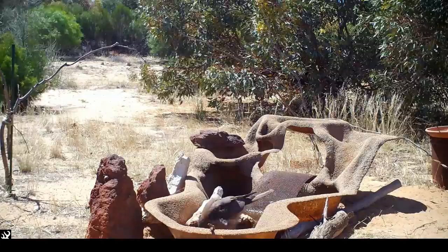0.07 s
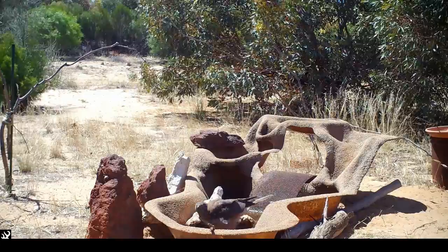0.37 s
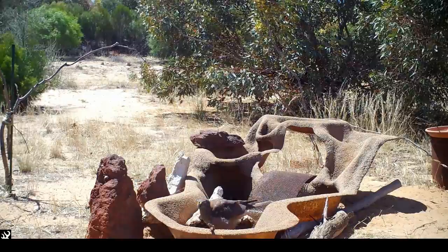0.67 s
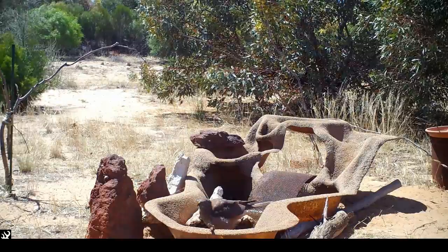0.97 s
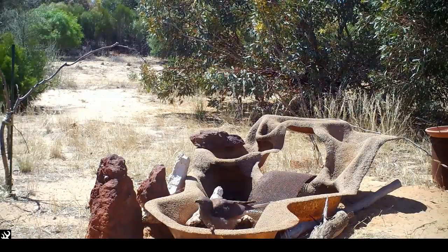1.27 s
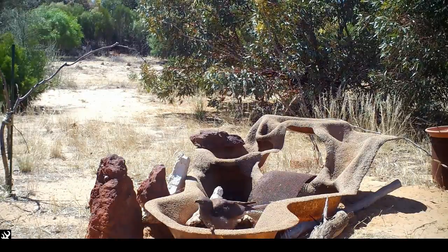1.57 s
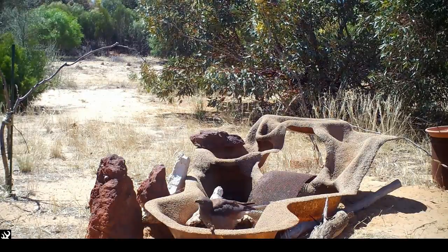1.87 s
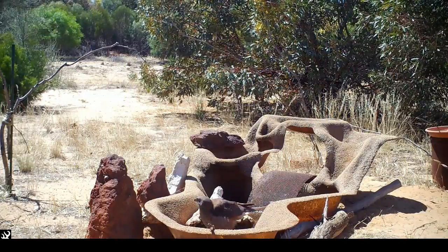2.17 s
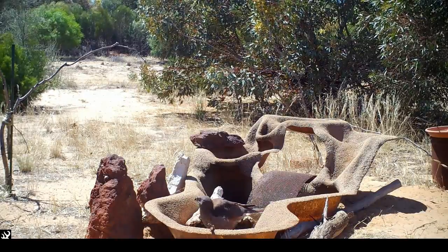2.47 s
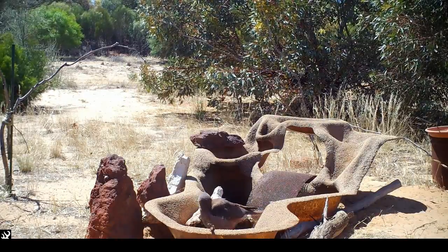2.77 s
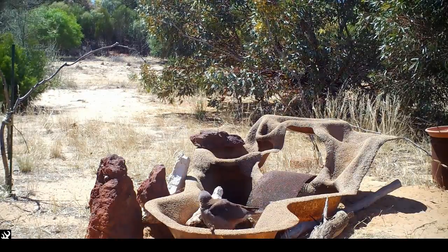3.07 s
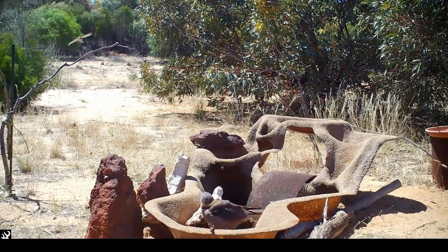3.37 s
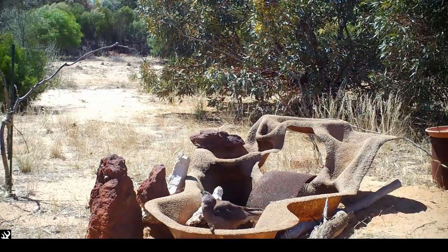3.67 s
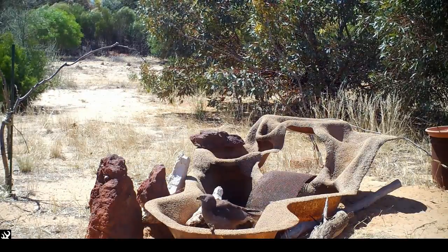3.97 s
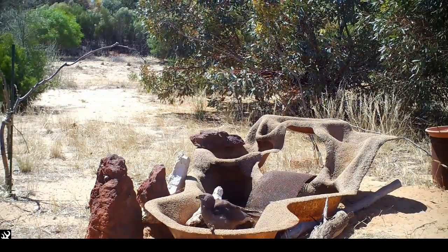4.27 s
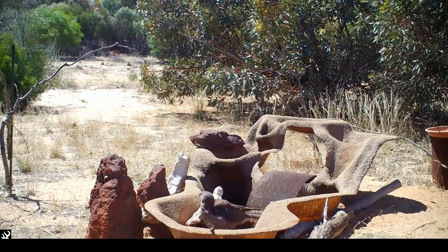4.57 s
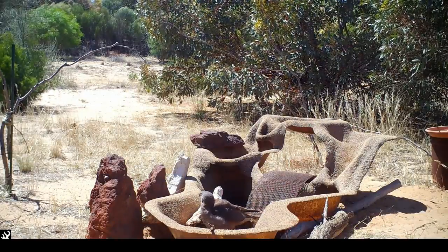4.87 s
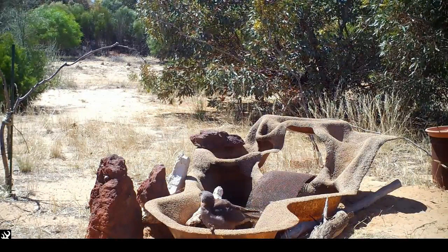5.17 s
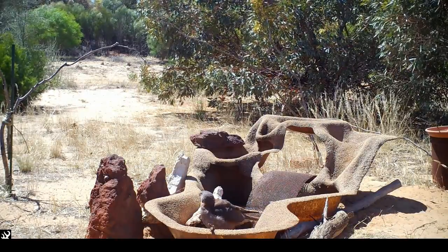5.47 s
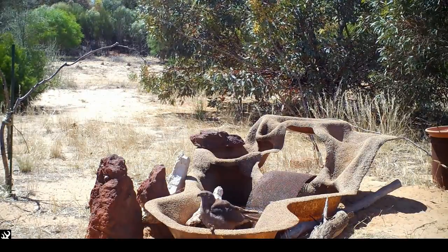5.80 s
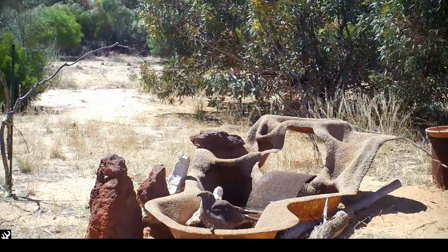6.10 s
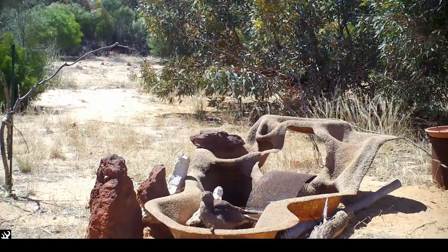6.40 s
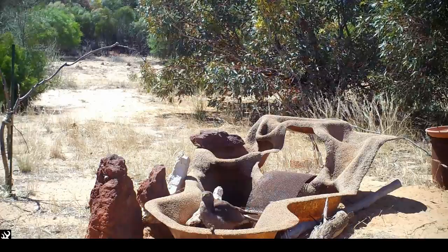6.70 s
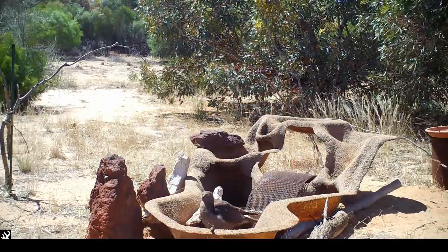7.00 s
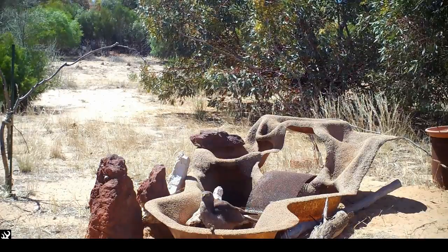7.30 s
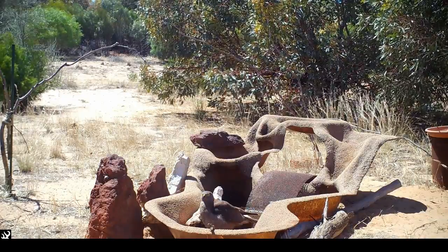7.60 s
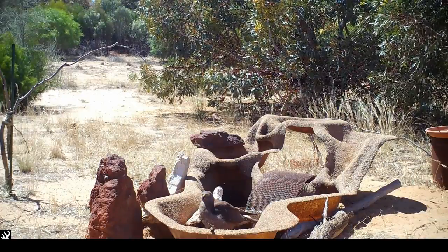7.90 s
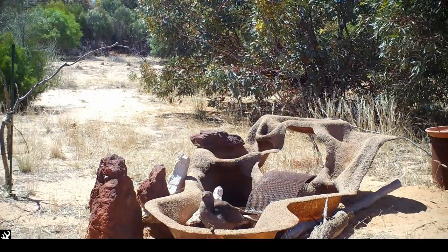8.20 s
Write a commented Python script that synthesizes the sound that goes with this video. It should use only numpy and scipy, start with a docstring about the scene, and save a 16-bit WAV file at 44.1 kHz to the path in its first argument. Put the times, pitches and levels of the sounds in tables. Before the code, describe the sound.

Light wind hisses steadily through dry scrub and softly brushes the microphone. A bee hums faintly past. Around the middle, a nearby bird snaps its bill once, then sings a quick two-second phrase of buzzy rising slurs, stepped whistles and dipping chirps. The song scatters lightly off rocks and trees and fades a little toward its end, leaving only the soft wind in the garden.

```python
"""Light wind hisses in dry scrub and brushes the microphone, over a faint camera whine; a bee hums past.
A bird snaps its bill once, then sings fourteen quick notes: buzzy rising slurs, stepped whistles and
dipping chirps; the last slur leaves a faint distant echo. The syrinx makes gliding harmonics and its
fluttering membranes add the buzz. The song bounces off hard ground; rocks, shrubs and trees scatter
both song and snap. A tiny peep sounds near the start and another near the end."""
import sys
import numpy as np
from scipy import signal
from scipy.fft import rfft, irfft
from scipy.io import wavfile
from scipy.ndimage import uniform_filter1d

SR = 44100
rng = np.random.default_rng(int(sys.argv[2]) if len(sys.argv) > 2 else 0)


def log_audio(samples):
    """Write samples as a 16-bit WAV file to the path given in sys.argv[1]."""
    # one column per channel
    frames = np.atleast_2d(samples).T
    # limit to full scale, then quantise
    limited = np.clip(frames, -1, 1)
    pcm = np.round(limited * 32767).astype(np.int16)
    wavfile.write(sys.argv[1], SR, pcm)


N = 363825
T = np.arange(N) / SR

# Table levels are relative, within each layer.
# hiss of air in the scrub: f/Hz, level/dB
LEAF_HISS = [(25, -22.5), (54, -16), (130, -10.5), (230, -6.5), (420, -4), (900, -2), (1330, -4),
             (2240, -8), (3090, -13), (4000, -20), (5000, -29), (6300, -39.5), (8000, -45.5)]
# puffs of air on the microphone: t/s, half length/s, rumble gain/dB
MIC_PUFFS = [(.65, .4, 9), (2.733, 0.03, 20), (3.297, 0.29, 4), (4.935, .022, 17.5), (5.352, 0.32, -0.5)]
# the bee's fly-by: t/s, wingbeat f/Hz, level/dB
BEE_PASS = [(1.7, 237.4, -88), (1.88, 240.8, -68), (2.0, 232.5, -72), (2.1, 232.3, -63.5), (2.2, 223, -72),
            (2.399, 240, -88)]
# wingbeat harmonics, from the first up: level/dB
WING_HARMONICS = [-3, -12, -4, 1.5, -1]
# the bill's snap and its instant reflection: t/s, level/dB
SNAP_CLICKS = [(3.7799, 12), (3.7829, 6.5)]
# tone colour of the click, with a peak near 2 kHz and a dip near 3.9 kHz: f/Hz, level/dB
CLICK_COLOUR = [(300, -37), (700, -23.5), (1100, -10), (1500, -6.5), (1900, 4), (2400, -4.5), (3100, -7.5),
                (3900, -27.5), (5000, -11.5), (5700, -15.5), (6600, -39), (9400, -30), (11500, -49.5),
                (13500, -46.5), (16000, -57)]
# the bill opens as the phrase builds and closes as it fades: t/s, treble tilt/(dB per octave)
BILL_OPENING = [(4.06, -22), (4.13, -27), (4.19, 4), (4.29, -3.5), (4.37, 2.5), (4.73, 3), (5.36, 3),
                (5.6, 2), (5.94, -3.5)]
# harmonics of the syrinx, from the first up: level/dB
SYRINX_HARMONICS = [3, -0.5, -21.5, -25.5, -23, -28.5, -41]
# tone colour of the song, with the same peak and dip as the click: f/Hz, level/dB
SONG_COLOUR = [(750, -36), (1050, -23), (1300, -9), (1550, -1), (2000, 2.5), (2400, -8.5), (2750, -7.5),
               (3900, -38.5), (4900, -36), (6100, -14), (7000, -30.5), (8200, -46.5), (11000, -60.5)]
# air rushing through the throat on buzzy notes: f/Hz, level/dB
BREATH_SPECTRUM = [(500, -62.5), (1300, -22.5), (1750, -2), (2250, -11.5), (2900, -17), (4200, -32.5),
                   (6000, -33.5), (7000, -45), (9000, -66.5)]
# faint rising glides; the outer two are peeps, the middle two a distant echo of the last slur:
# t/s, length/s, start f/Hz, end f/Hz, level/dB
FAINT_GLIDES = [ (.747, 0.0068, 1590, 2200, -52), (6.020, 0.017, 1880, 2160, -53.5),
                (6.050, 0.013, 2100, 2170, -55), (8.083, 0.0084, 1600, 1980, -54)]
# dipping chirps: leap t/s, leap to dip/s, dip f/Hz, leap level/dB, dip level/dB, crest level/dB
CHIRP_NOTES = [ (4.562, 0.034, 2260, -28, -28, -30), (4.946, 0.03, 2165, -30, -26.5, -35),
               (5.335, .027, 2093, -30, -24, -36), (5.74, 0.032, 2090, -32.5, -28.5, -35.5)]
# stepped whistles: step t/s, hold before it/s, f/Hz, level/dB, mid-hold gain/dB, buzz/0-1,
# level after the step/dB
WHISTLE_NOTES = [ (4.478, 0.032, 1992, -21.5, -16.5, 0.4, -29), (4.853, 0.041, 1975, -24, -3, .05, -29.5),
                 (5.241, 0.046, 1939, -25.5, 4, .02, -28.5), (5.638, 0.044, 1924, -29, 0.5, .02, -33.5)]
# buzzy slurs: flick t/s, climb before it/s, attack/s, start f/Hz, knee f/Hz, top f/Hz,
# climb level/dB, flick level/dB
SLUR_NOTES = [ (4.191, 0.12, 0.019, 735, 1024, 2210, -27, -19.5),
              (4.365, 0.11, 0.0035, 839, 1076, 2275, -28.5, -21),
              (4.727, 0.071, 0.014, 985, 1156, 2375, -35, -22),
              (5.114, 0.074, 0.016, 1038, 1100, 2360, -34, -24),
              (5.509, .073, 0.0083, 983, 1074, 2360, -35, -26.5),
              (5.931, 0.091, 0.03, 955, 1057, 2310, -37, -30)]
# moments when a slur's buzz locks into a loud clear tone: t/s, half length/s, gain/dB
CLEAR_MOMENTS = [(4.084, 0.0058, 3), (4.141, 0.0072, 10), (4.163, 0.003, 5), (4.304, 0.014, 10)]


def undb(db):
    """Decibels to gain."""
    return 10 ** (np.asarray(db) / 20)


def unit(x):
    """Scale to rms 1."""
    return x / np.sqrt(np.mean(x ** 2))


def bump(t, at, width):
    """A smooth swell from 0 to 1 and back."""
    return np.exp(-((t - at) / width) ** 2)


def gain_at(hz, spectrum):
    """Gain of an (f/Hz, level/dB) curve, joined on a log-frequency axis."""
    at, db = np.transpose(spectrum)
    return undb(np.interp(np.log(np.maximum(hz, 1)), np.log(at), db))


def noise(spectrum):
    """Noise of rms 1, coloured by an (f/Hz, level/dB) curve."""
    hz = np.arange(N // 2 + 1) * SR / N
    return unit(irfft(rfft(rng.standard_normal(N)) * gain_at(hz, spectrum), N))


def drift(rate):
    """Smooth random movement of rms 1 that turns about rate times a second."""
    hold = max(int(SR / rate), 1)
    steps = np.repeat(rng.standard_normal(N // hold + 1), hold)
    return unit(uniform_filter1d(steps, hold)[:N])


def impulse_response(spectrum, size=1024):
    """Minimum-phase impulse response of an (f/Hz, level/dB) curve."""
    hz = np.arange(size // 2 + 1) * SR / size
    cepstrum = irfft(np.log(gain_at(hz, spectrum)))
    cepstrum[1:size // 2] *= 2
    cepstrum[size // 2 + 1:] = 0
    return irfft(np.exp(rfft(cepstrum)))


def camera(whine_hz=7796.3, flips_per_s=59.5, whine_db=-81.5, hiss_db=-89):
    """A thin whine that keeps flipping polarity, over faint electronic hiss."""
    polarity = uniform_filter1d(np.sign(np.sin(np.pi * flips_per_s * T)), size=40)
    whine = np.sqrt(2) * polarity * np.sin(2 * np.pi * whine_hz * T)
    hiss = noise([(3000, 11.5), (7500, 9.5), (10000, 1.5), (15000, -3.5)])
    return undb(whine_db) * whine + undb(hiss_db) * hiss


def wind(hiss_db=-57, rumble_db=-85, gust_hiss_db=1.5, gust_rumble_db=18):
    """A bed of leaf hiss and low buffets on the microphone; both swell with one soft gust."""
    gust = bump(T, at=4.26, width=0.75)
    hiss = noise(LEAF_HISS) * undb(hiss_db + gust_hiss_db * gust + 0.5 * drift(13))
    puffs_db = sum(db * bump(T, at, width) for at, width, db in MIC_PUFFS)
    rumble = noise([(12, -16), (35, -4.5), (90, -5.5), (200, -12.5), (800, -70), (3000, -100)])
    return hiss + rumble * undb(rumble_db + gust_rumble_db * gust + puffs_db + 3 * drift(12))


def bee(wobble=0.0065):
    """Beating wings make a wavering hum that swells and fades as the bee drifts by."""
    times, hz, db = np.transpose(BEE_PASS)
    wingbeat_hz = np.interp(T, times, hz) * (1 + wobble * drift(38))
    phase = 2 * np.pi * np.cumsum(wingbeat_hz) / SR
    hum = sum(undb(level) * np.sin(k * phase) for k, level in enumerate(WING_HARMONICS, 1))
    return hum * np.interp(T, times, undb(db), left=0, right=0)


def garden_echoes(x, near_t60=0.047, scrub_t60=1.0, trees_s=0.2):
    """Adds the garden's scatter to a sound; leaves soak up more treble on the longer paths."""
    t = T[:SR // 2]
    build_up = np.clip((t - .004) / 0.054, 0, 1)
    # level/dB, envelope, low-pass f/Hz
    paths = [(-14, build_up * undb(-60 * t / near_t60), 11000),  # near rocks and shrubs
             (-26, build_up * undb(-60 * t / scrub_t60), 4500),  # thin tail from the scrub
             (-31, bump(t, trees_s, width=0.033), 3000)]  # soft echo off the tree line
    scatter = 0
    for db, envelope, cutoff_hz in paths:
        echoes = undb(db) * envelope / np.linalg.norm(envelope) * rng.standard_normal(len(t))
        scatter = scatter + signal.sosfilt(signal.butter(2, cutoff_hz, fs=SR, output="sos"), echoes)
    return x + signal.fftconvolve(x, scatter)[:N]


def ground_bounce(x, lag_s=0.002545, bounce_db=-11):
    """Adds the instant bounce off hard ground, which beats against fast glides."""
    return x + undb(bounce_db) * np.interp(T - lag_s, T, x)


def bill_snap():
    """A sharp bill snap and its instant reflection, heard as a double click."""
    clicks = np.zeros(N)
    for at, db in SNAP_CLICKS:
        clicks[int(at * SR)] = undb(db)
    return signal.fftconvolve(clicks, impulse_response(CLICK_COLOUR))[:N]


def glide(at, length, low_hz, high_hz, db, buzz=0.28):
    """Contour of one short upward glide: a peep, or a scrap of the last slur's distant echo."""
    return [(at, low_hz, db, buzz), (at + length, high_hz, db, buzz)]


def chirp(at, length, dip_hz, leap_db, dip_db, crest_db, leap_s=0.012, hold_s=0.0046, lift_s=0.013):
    """Contour of a chirp that leaps up, crests, dips and lifts again."""
    dip = at + length
    crest_hz, lift_hz = dip_hz * 1.085, dip_hz * 1.17
    return [(at - leap_s, 1520, leap_db - 19.5, .64),
            (at, 1930, leap_db, .64),
            (at + leap_s, crest_hz, leap_db - 6, .12),
            (at + length / 2, crest_hz, crest_db, .12),
            (dip - hold_s / 2, dip_hz, dip_db - 2, .06),
            (dip + hold_s, dip_hz * 1.025, dip_db, .06),
            (dip + lift_s, lift_hz, dip_db - 18.5, .12),
            (dip + lift_s + .01, lift_hz * .96, dip_db - 16, .35)]  # sagging release


def whistle(step, length, hz, db, mid_db, buzz, step_db, step_s=.003, top_s=.017, release_s=.0091):
    """Contour of a whistle: a low rasp, a held tone that bows slightly, a step up and a fall."""
    start = step - length
    rasp_hz, edge_hz, top_hz = hz * .93, hz * 1.022, hz * 1.29
    return [(start - .018, rasp_hz, db - 15, .7),
            (start - .0043, rasp_hz, db - 13, .7),
            (start, edge_hz, db, buzz),
            (start + length * .36, hz, db + mid_db, buzz),
            (step - length * .36, hz, db + mid_db * .46, .013),
            (step - step_s / 2, edge_hz, db, .013),
            (step + step_s / 2, top_hz * .97, step_db - 5, .064),
            (step + top_s / 2, top_hz, step_db, .064),
            (step + top_s, top_hz * .985, step_db - 8, .064),
            (step + top_s + release_s, top_hz * .9, step_db - 8.5, .35)]


def slur(flick, length, attack_s, low_hz, knee_hz, top_hz, db, flick_db,
         knee_s=0.017, top_s=0.0041, release_s=0.012):
    """Contour of a buzzy slur that swells as it climbs ever faster, flicks up and dies away."""
    start = flick - length
    progress = np.linspace(0, 1, num=40)
    t = start + progress * (length - knee_s)
    pitch = low_hz + (knee_hz - low_hz) * progress ** 1.7
    onset = np.maximum(1 - ((t - start) / attack_s) ** 4, 0)
    level = db + 3 * (progress - .5) - 9.5 * onset
    buzz = 0.56
    for at, width, gain_db in CLEAR_MOMENTS:
        clear = np.exp(-((t - at) / width) ** 4)
        level = level + gain_db * clear
        buzz = buzz * (1 - 0.73 * clear)
    return [*zip(t, pitch, level, buzz),
            (flick - knee_s * .6, knee_hz * 1.23, db - 7, .27),  # ducks just before the flick
            (flick - .0057, knee_hz * 1.2, db - 6, .27),
            (flick, top_hz * .78, flick_db, 1),
            (flick + top_s, top_hz, flick_db - 7, .27),
            (flick + top_s + release_s, top_hz * .86, flick_db - 17.5, 1)]


def syrinx(contour, flutter, jitter, breath, fade_s=.004, chop_depth=0.77, tilt_from_hz=2200):
    """Sings a contour (t/s, f/Hz, level/dB, buzz/0-1) as gliding harmonics, strongest near 2 kHz."""
    times, *curves = np.transpose(contour)
    times = np.sort(times)
    span = slice(int((times[0] - fade_s) * SR), int((times[-1] + fade_s) * SR))
    t = T[span]
    pitch, db, buzz = (uniform_filter1d(np.interp(t, times, curve), size=130) for curve in curves)
    buzz = np.clip(buzz, 0, 1)
    # the membranes' flutter bends and chops the tone; jitter roughens its pitch
    bend = 0.005 * buzz * flutter[span]
    chop = (1 + chop_depth * buzz * flutter[span]) / np.sqrt(1 + buzz ** 2 / 2)
    rasp = (0.0076 + 0.016 * buzz) * jitter[span]
    pitch = pitch * (1 + bend + rasp)
    phase = 2 * np.pi * np.cumsum(pitch) / SR
    # low notes speak through their second harmonic, high ones through the first
    k = np.arange(1, len(SYRINX_HARMONICS) + 1)[:, None]
    weight = undb(SYRINX_HARMONICS)[:, None] * gain_at(k * pitch, SONG_COLOUR)
    # an open bill lets out more overtones and more rushing air
    tilt = np.interp(t, *np.transpose(BILL_OPENING))
    weight = weight * undb(tilt * np.maximum(np.log2(k * pitch / tilt_from_hz), 0))
    tone = np.sum(weight * np.sin(k * phase), axis=0) / np.sqrt(np.sum(weight ** 2, axis=0) / 2)
    air = undb(-13 + tilt / 2) * buzz * breath[span]
    to_edge_s = np.minimum(t - t[0], t[-1] - t)
    fade = np.sin(np.pi / 2 * np.clip(to_edge_s / fade_s, 0, 1)) ** 2
    return span, (tone + air) * chop * fade * undb(db)


def birdsong(flutter_hz=191.9, flutter_spread=0.175, gain_db=-1.5):
    """One voice sings every note, with the same membrane flutter, pitch jitter and breath."""
    flutter_rate = flutter_hz * (1 + flutter_spread * drift(120))
    flutter = np.sin(2 * np.pi * np.cumsum(flutter_rate) / SR)
    jitter, breath = drift(700), noise(BREATH_SPECTRUM)
    song = np.zeros(N)
    gestures = (slur, SLUR_NOTES), (whistle, WHISTLE_NOTES), (chirp, CHIRP_NOTES), (glide, FAINT_GLIDES)
    for gesture, notes in gestures:
        for note in notes:
            span, sound = syrinx(gesture(*note), flutter, jitter, breath)
            song[span] += sound
    return undb(gain_db) * song


def scene(snap_send_db=-5):
    """The bird up front, over wind, bee and camera noise; the snap sits drier than the song."""
    snap, send = bill_snap(), undb(snap_send_db)
    bird = garden_echoes(ground_bounce(birdsong()) + send * snap) + (1 - send) * snap
    return (bird + wind() + bee() + camera())[None]


def record(dry, cutoff_hz=15700):
    """The camera cuts the top treble steeply."""
    return signal.sosfilt(signal.ellip(8, .2, 70, cutoff_hz, fs=SR, output="sos"), dry)


dry = scene()
out = record(dry)
log_audio(out)
```